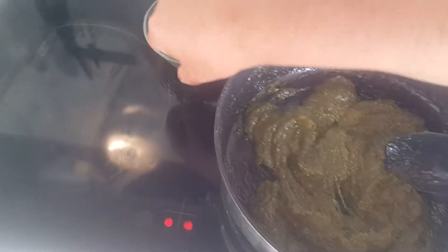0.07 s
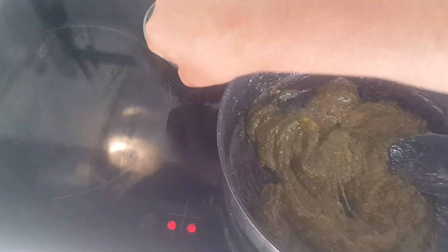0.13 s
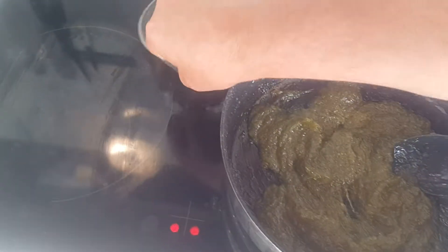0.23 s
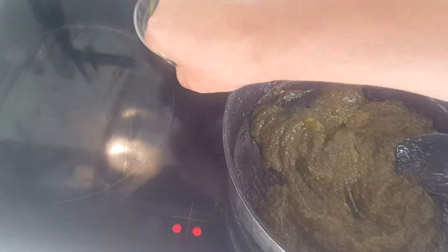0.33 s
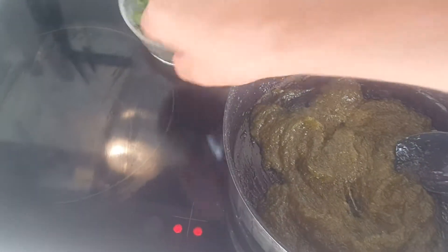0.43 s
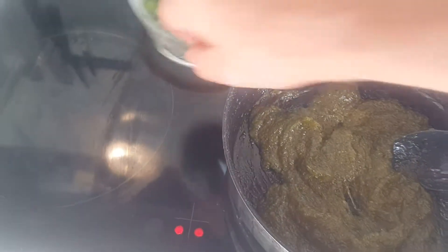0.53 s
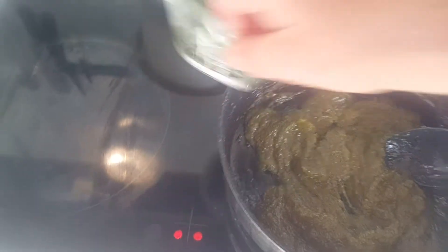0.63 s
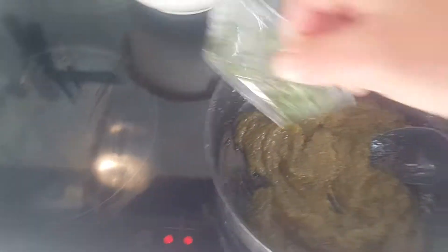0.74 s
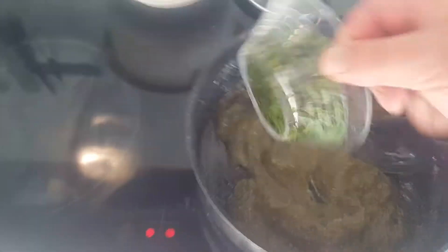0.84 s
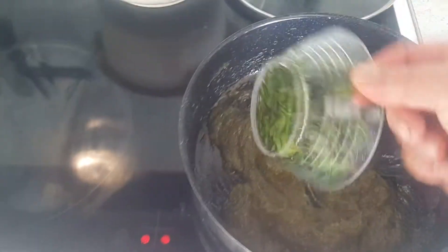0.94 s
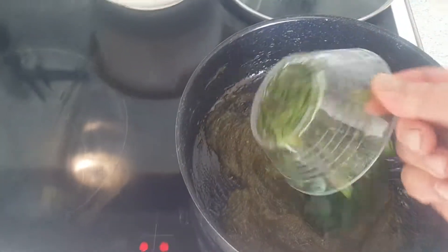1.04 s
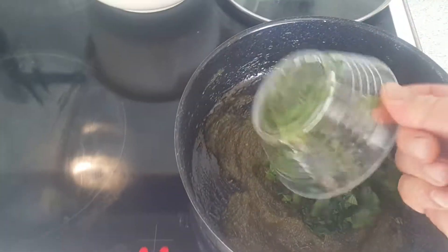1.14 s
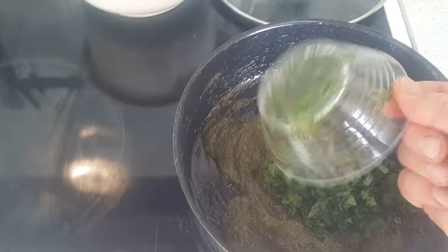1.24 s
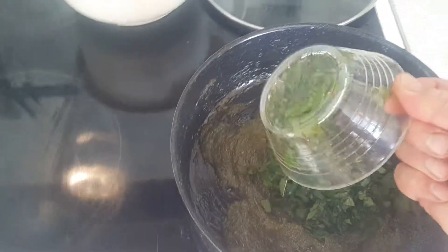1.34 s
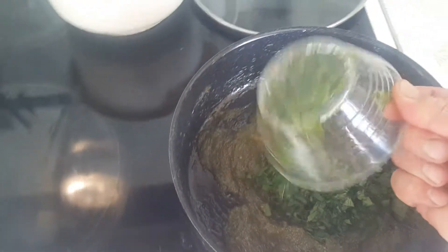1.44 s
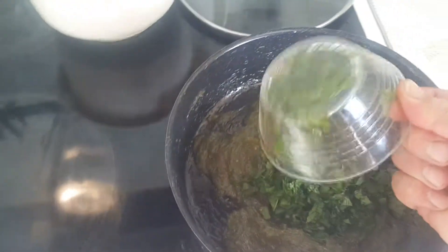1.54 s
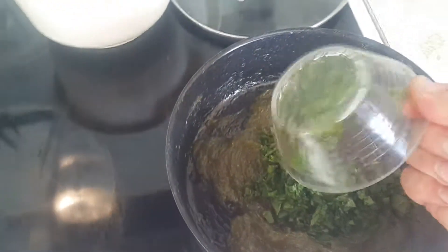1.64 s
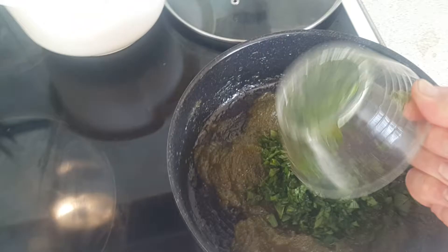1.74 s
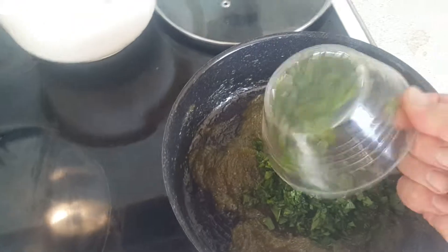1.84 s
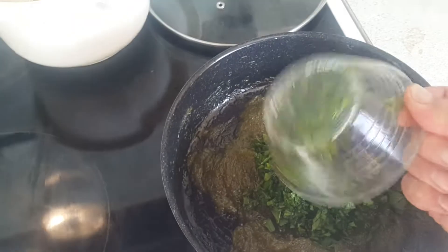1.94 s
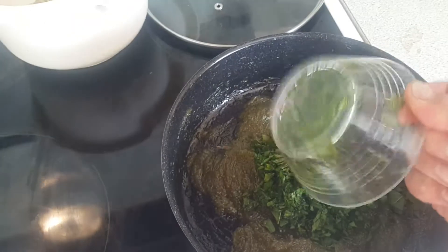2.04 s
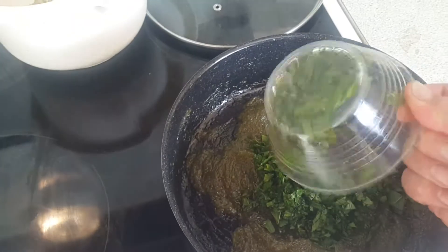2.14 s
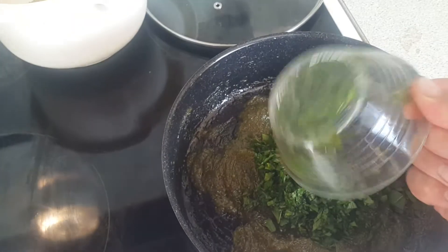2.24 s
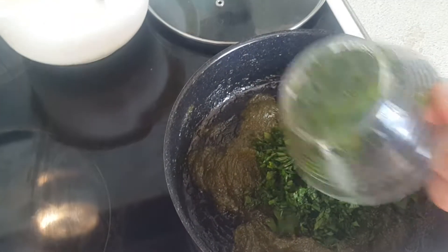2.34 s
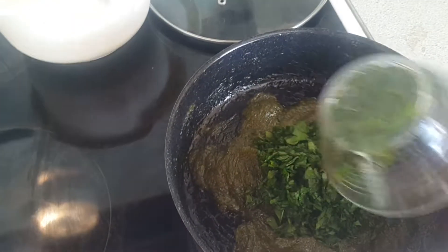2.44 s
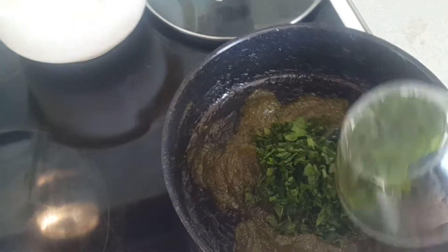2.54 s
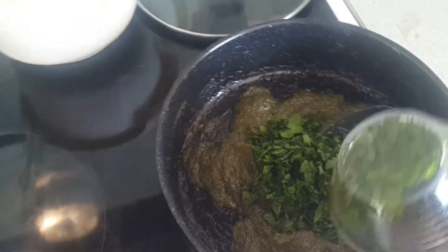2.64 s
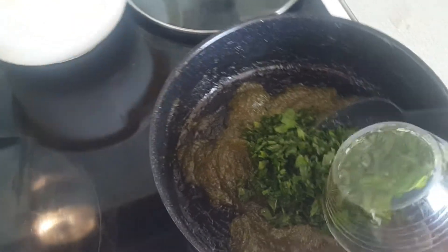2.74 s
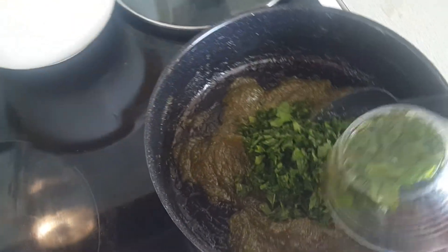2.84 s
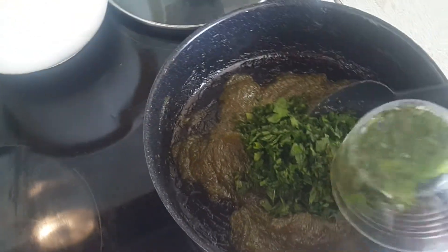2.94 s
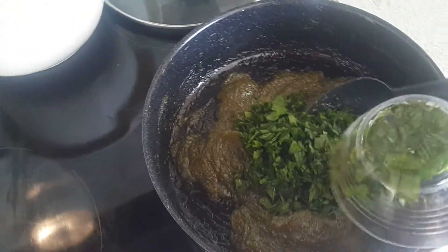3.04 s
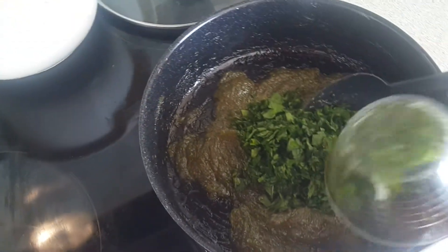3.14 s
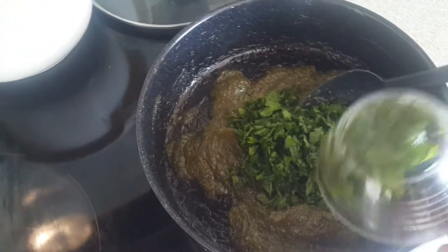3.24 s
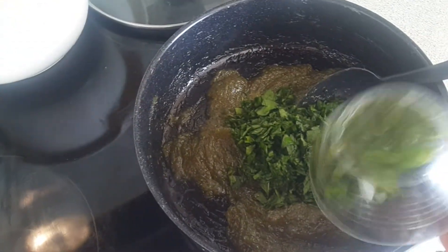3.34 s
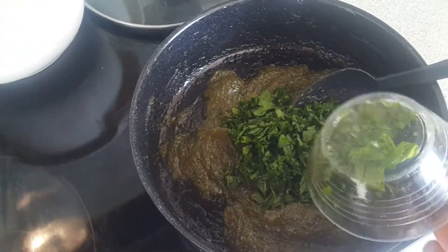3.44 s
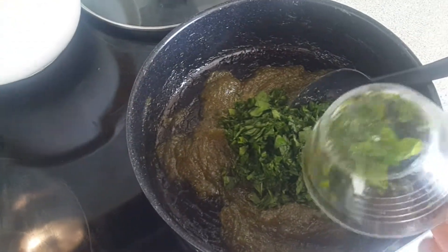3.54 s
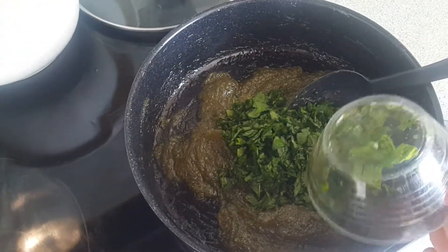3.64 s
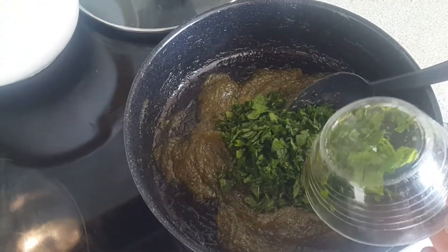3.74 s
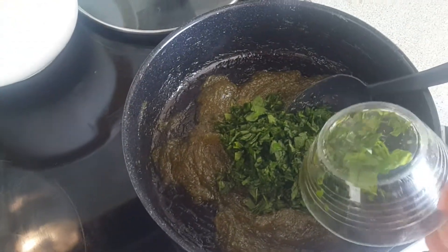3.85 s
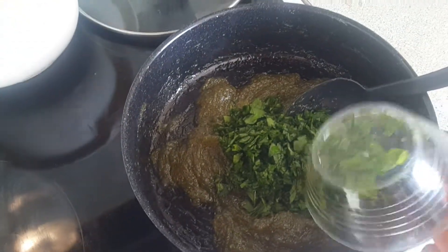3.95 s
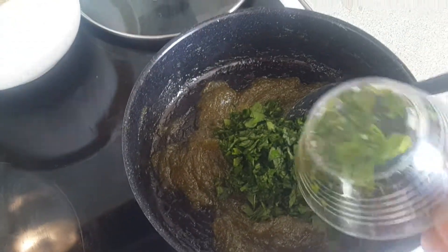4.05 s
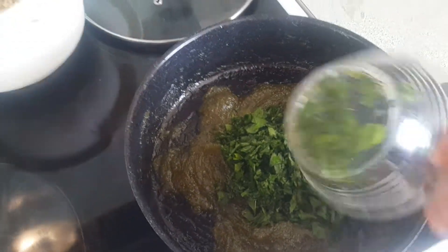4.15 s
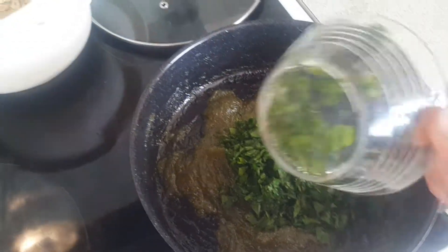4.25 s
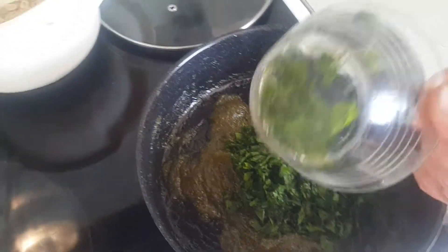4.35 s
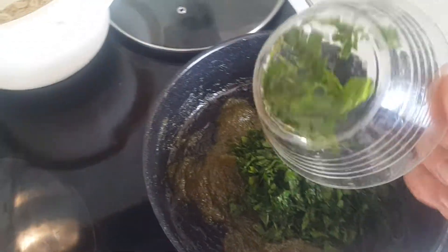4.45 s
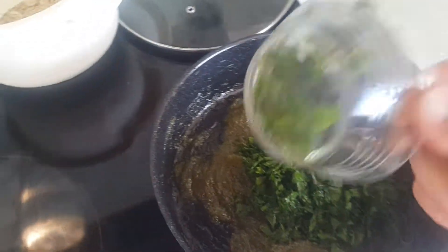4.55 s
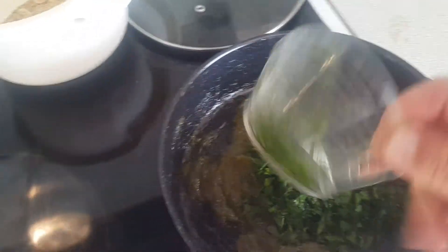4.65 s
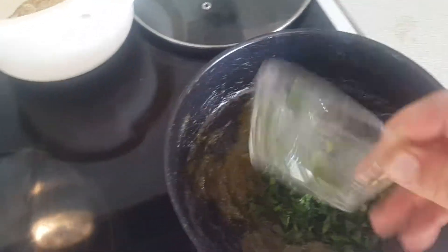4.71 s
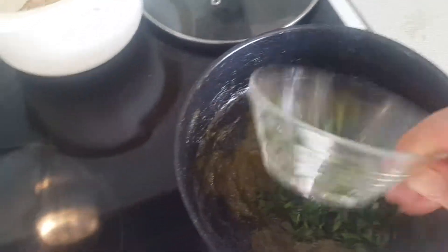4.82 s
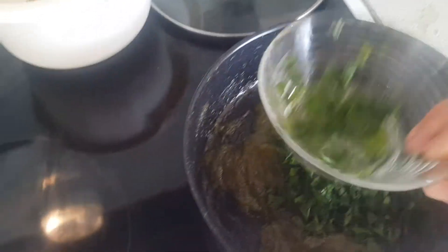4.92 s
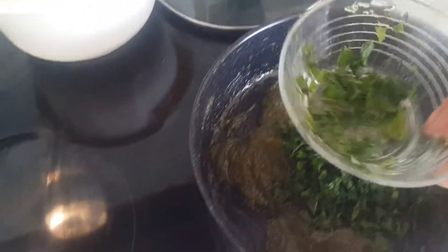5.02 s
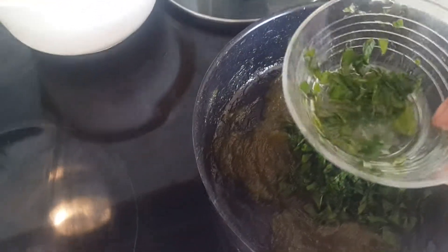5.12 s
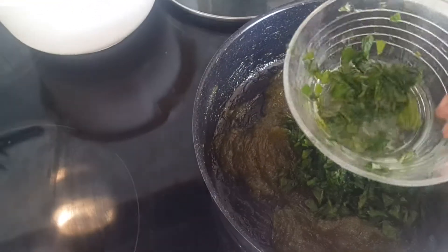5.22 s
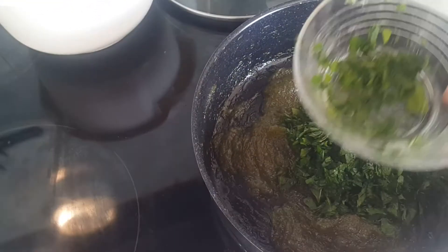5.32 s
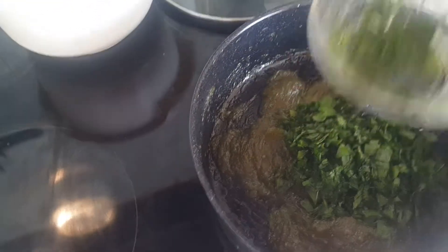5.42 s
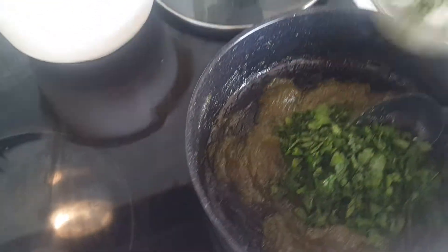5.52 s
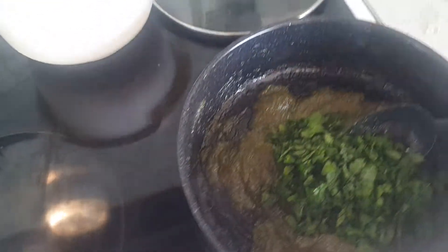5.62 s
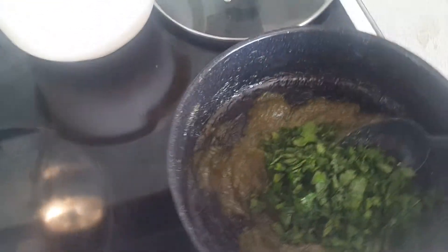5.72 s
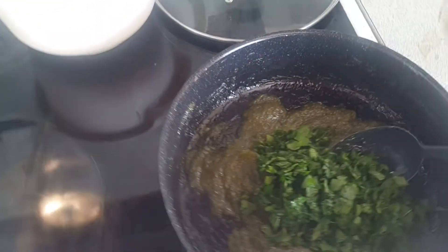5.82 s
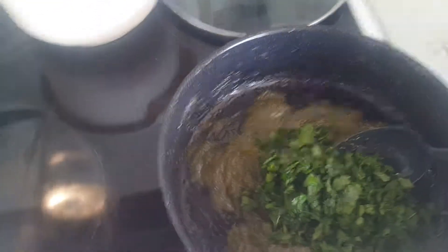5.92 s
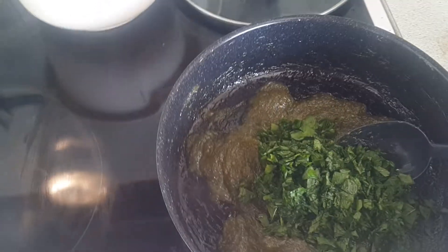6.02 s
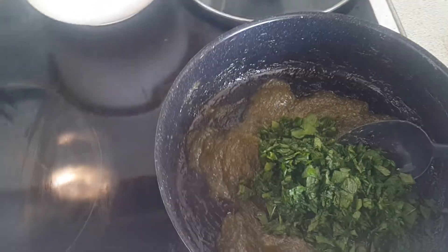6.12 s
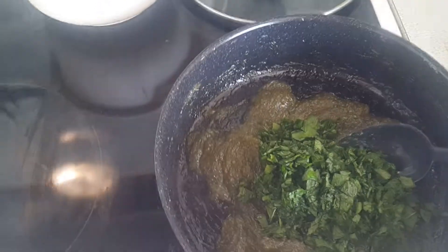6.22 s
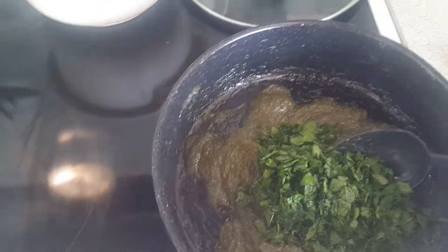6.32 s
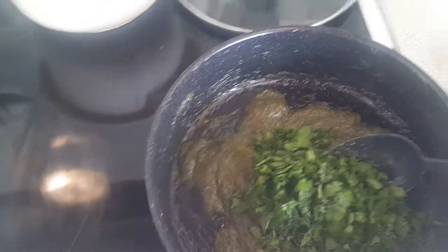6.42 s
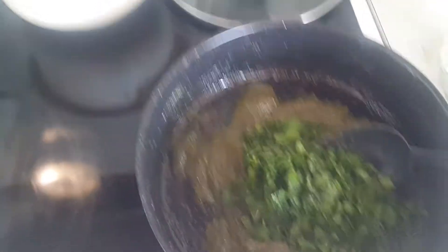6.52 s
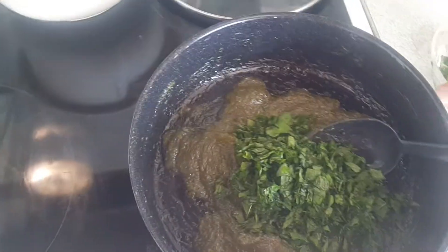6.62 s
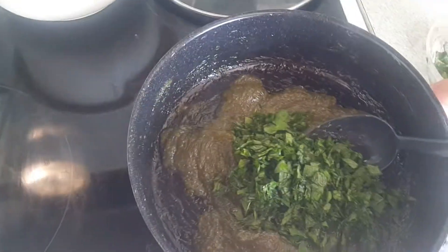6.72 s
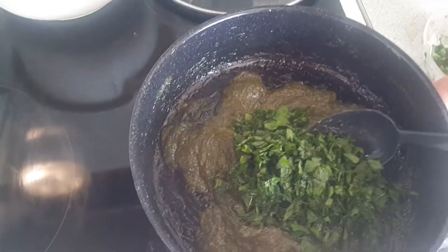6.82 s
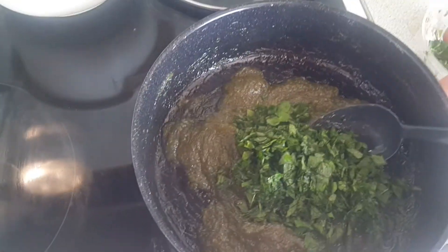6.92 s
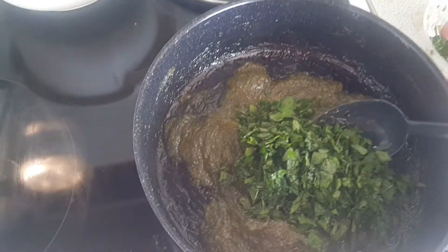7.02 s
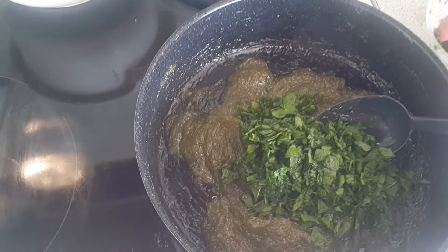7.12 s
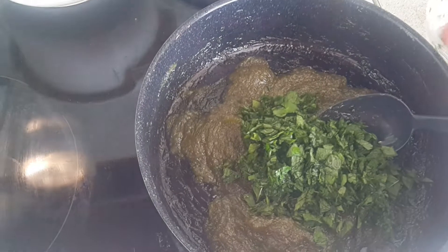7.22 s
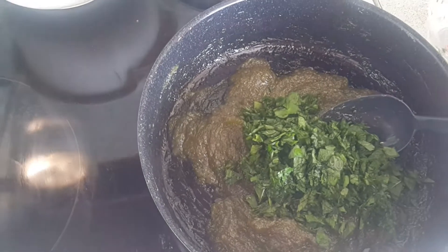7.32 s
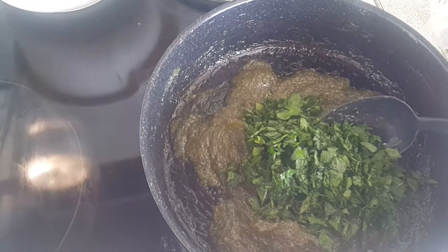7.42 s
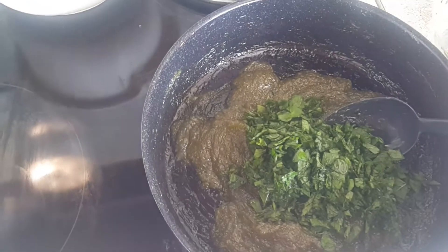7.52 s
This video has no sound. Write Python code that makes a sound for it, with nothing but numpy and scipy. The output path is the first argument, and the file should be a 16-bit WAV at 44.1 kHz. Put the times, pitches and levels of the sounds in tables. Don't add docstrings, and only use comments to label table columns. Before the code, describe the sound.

A plastic bowl raps sharply on a ringing pan in a quiet humming kitchen, then lands on a stone counter and rattles to rest.

```python
import sys
import numpy as np
from scipy import signal
from scipy.fft import rfft, irfft, next_fast_len
from scipy.io import wavfile

SR = 44100
rng = np.random.default_rng(int(sys.argv[2]) if len(sys.argv) > 2 else 0)


def magnitude_from_level(level_db):
    exponent = np.asarray(level_db, float) / 20
    return 10 ** exponent


def unload_wav(signal):
    wavfile.write(
        sys.argv[1],
        SR,
        np.round(np.clip(np.atleast_2d(signal).T, -1, 1) * 32767).astype(np.int16),
    )


N = 333837


def rms_one(x):
    return x / np.sqrt(np.mean(x ** 2) + 1e-20)


def at_hz(points, hz):
    table_hz, value = np.array(points).T
    return np.interp(np.log(hz + 1e-9), np.log(table_hz), value)


def drift(rate, size=N):
    knots = rng.standard_normal(400)
    return np.interp(np.arange(size) * rate / SR, np.arange(len(knots)), knots)


def ring(x, hz, t60):
    r, w = magnitude_from_level(-60 / (t60 * SR)), 2 * np.pi * hz / SR
    return signal.lfilter([0, np.sin(w)], [1, -2 * r * np.cos(w), r * r], x)


def add(out, s, sound):
    i = int(round(s * SR))
    out[:, i:i + sound.shape[-1]] += sound[..., :N - i]


# frequency in Hz, likeness from -1 to 1.
LIKENESS = [(60, 0.66), (180, 0.94), (550, 0.69), (1650, -0.1), (4970, -0.12), (15000, -0.15)]


def bands(spectrum, size):
    hz = np.fft.rfftfreq(size, 1 / SR)
    mid, side = rfft(rng.standard_normal((2, size)))
    alike = np.clip(at_hz(LIKENESS, hz), -1, 1)
    stereo = np.sqrt(1 + alike) * mid + np.sqrt(1 - alike) * side * [[1], [-1]]
    both = magnitude_from_level(at_hz(spectrum, hz)) * stereo
    both = both / np.sqrt(2 * np.mean(np.abs(both) ** 2) / size)
    place = 2 * np.log2(hz / 20 + 1e-9)
    return [(20 * 2 ** (k / 2), irfft(both * np.clip(1 - np.abs(place - k), 0, 1), size))
            for k in range(21)]


def body_rings(modes, t):
    hz, level_db, t60 = np.array(modes).T[:, :, None]
    turn = rng.standard_normal((2, 2, len(modes), 1))
    phase = 2 * np.pi * hz * t + turn[0] * np.minimum((hz / 1100) ** 2, 3)
    twin = 0.46 * np.sin(phase + 2 * np.pi * .006 * hz * t * np.sign(turn[1, :1]) + turn[1])
    rings = magnitude_from_level(level_db - 60 * t / t60) * (np.sin(phase) + twin)
    waver = np.array([[drift(40 + .018 * f, size=2 * len(t)) for f in hz[:, 0]] for side in (0, 1)])
    share = np.clip(0.92 * np.minimum(hz / 3000, 1), 0, 1)
    swing = magnitude_from_level(1.2 * waver * np.minimum(hz / 1500, 1))
    return rings, swing * (1 - share + 1.6 * share * waver[:, ::-1])


# frequency in Hz, t60 in seconds.
KITCHEN = [(100, 0.92), (260, 0.35), (700, 0.41), (1840, 0.39), (4850, 0.42), (12800, 0.25)]


def struck(hits, modes, tail, cycles, swell, modes_db, tail_db, grip, contact_s, crack_t60,
           dry, pan_db, lag_s, size):
    out, t = np.zeros((2, N)), np.arange(size) / SR
    rise = 1 - np.exp(-t / contact_s)
    centre, noise = zip(*bands(tail, 2 * size)[4:])
    centre, noise = np.array(centre)[:, None], np.array(noise)
    dying = magnitude_from_level(-60 * t / (dry * at_hz(KITCHEN, centre))) * (1 - np.exp(-t * centre))
    bright, air = (centre > 2400) & (centre < 6500), centre > 6500
    snap = magnitude_from_level(6.0 - 60 * t / crack_t60) * noise[11:, ::-1, :size].sum(axis=0)
    rings, broken = body_rings(modes, t)
    rattle = magnitude_from_level(2.5 * drift(180, size=2 * size))
    mode_hz = np.array(modes)[:, 0]
    high, low = mode_hz > 2400, mode_hz < 450
    chance = rng.standard_normal((len(hits), 2, len(modes) + len(centre)))
    for (s, thud_db, hz, ring_db, treble_db, crack_db, weight_db), luck in zip(hits, chance):
        z, colour = np.split(luck, [len(modes)], axis=1)
        shape = (t * hz / cycles) ** swell * np.exp(-t * hz / cycles)
        thud = -np.sin(2 * np.pi * hz * t + 2.61) * shape / shape.max()
        late = np.interp(t - lag_s, t, thud, left=0)

        start = int(abs(colour[1, 0]) * SR) % size
        now = slice(start, start + size)
        strengths = magnitude_from_level(modes_db + 1.4 * z[:1] + 1.8 * z + treble_db * high + weight_db * low)
        ringing = np.einsum("cm,cmt,cmt->ct", strengths, rings, broken[..., now])

        sway = magnitude_from_level(2 * np.sin(2 * np.pi * (25 * t + z[0, 0])))
        tint = magnitude_from_level(1.5 * colour[0, :, None] + treble_db * bright + crack_db * air)
        gains = tint * np.where(bright | air, rattle[now], sway)
        wash = np.einsum("bct,bt->ct", noise[..., now], gains * dying)
        wash = wash + magnitude_from_level(crack_db) * np.sign(colour[-1, -1]) * snap
        body = ringing + magnitude_from_level(tail_db) * wash

        held_db = grip * np.clip(-ring_db, 0, 12) * np.exp(-t / 0.025)
        add(out, s, magnitude_from_level(thud_db) * magnitude_from_level([[pan_db], [-pan_db]]) * [thud, late])
        add(out, s, magnitude_from_level(ring_db + held_db) * rise * body)
    no_bass = signal.butter(3, 120, "high", fs=SR, output="sos")
    return signal.sosfilt(no_bass, out)


def blows(rows, hz, treble_db, crack_db):
    return [(s, thud_db, hz * 2 ** (.005 * hard), ring_db, treble_db + 0.62 * hard,
             crack_db + 0.71 * hard, weight_db)
            for s, thud_db, ring_db, hard, weight_db in rows]


# start in seconds, thud in dB, ring in dB, hardness in dB, weight on the low modes in dB.
KNOCKS = [(2.8175, -10, -9.5, -9, 3), (3.011, -14.5, -14, -3, 2), (3.1175, -2.5, -12.5, 1.8, -1),
          (3.1458, -2, 3.5, 2, -1.5), (3.172, -21, -11.5, -1.5, -4.5), (3.418, -1.5, -3, 3.5, -6),
          (3.431, -3, -3, 6.5, -6.5), (3.4335, -6.5, -26.5, -2, 0), (3.449, -14.5, -6.5, 2, -5.5),
          (3.684, -8, -15, 1, 3.5), (3.6893, -1, 0.5, 6, -6), (3.876, -13.5, -13.5, 0.5, -0.5),
          (3.8945, -2, -7.5, 4, -3), (3.9015, -6, -27.5, 2, 0), (3.9155, -12.5, -19.5, -4.5, 1.5)]
# frequency in Hz, level in dB, t60 in seconds.
PAN = [(160, -10.5, 0.13), (290.3, -7.5, 0.18), (325, -4, 0.31), (400, -18, 0.15), (515.4, -10.5, 0.17),
       (632, -6, 0.42), (717, -10.5, 0.37), (923, 3, 0.05), (928, -1.5, 0.31), (1003, -7, 0.26),
       (946, -6.5, 0.5), (1033, -11, 0.089), (1202, -4, 0.35), (1350, -9.5, 0.25), (1510, -1.5, 0.046),
       (1700, -8, 0.34), (1600, -15, 0.25), (1880, -12.5, 0.26), (2113, -9, 0.32), (2330, -15, 0.098),
       (2643, -11.5, 0.42), (2820, -18, 0.25), (3100, -11, 0.18), (4700, -23.5, .25), (4470, -20.5, 0.25),
       (4820, -26.5, 0.47), (5500, -22.5, 0.2), (4940, -27, 0.33), (4860, -23, .25), (5206, -26, 0.29),
       (5740, -27, .23), (3316, -19.5, 0.22), (1760, -10.5, .28)]
# frequency in Hz, level in dB per Hz.
KNOCK_TAIL = [(60, -30), (240, -11), (320, -1.5), (640, -2), (920, -1.5), (1150, -9.5), (1700, 2),
              (2150, -11.5), (2900, -10.5), (3900, -20), (4900, -16), (5700, -19), (7200, -29),
              (14800, -25)]


def knocks():
    on_spoon = blows(KNOCKS[:2], 920, treble_db=-0.5, crack_db=-3)
    on_rim = blows(KNOCKS[2:], 920, treble_db=-1.22, crack_db=-1.45)
    return struck(on_spoon + on_rim, PAN, KNOCK_TAIL, cycles=0.26, swell=2.8, modes_db=-23.0,
                  tail_db=-15.5, grip=0.92, contact_s=0.0012, crack_t60=0.033, dry=0.93,
                  pan_db=-0.8, lag_s=-0.00021, size=24000)


def settling():
    gaps_s = 0.023 * 0.81 ** np.arange(3)
    starts = 6.263 + np.cumsum(np.r_[0, gaps_s])
    return [(s, -28 - 7 * k, -9 - 20.5 * k, 5, 0) for k, s in enumerate(starts)]


# start in seconds, thud in dB, ring in dB, hardness in dB, weight on the low modes in dB.
ROCKING = [(6.0595, -5.5, -5.5, 6.5, -4.5), (6.0715, -12, -27, -12, 1), (6.0795, -18, -24, -13, -7),
           (6.0845, -19.5, -25, -9, -4), (6.0945, -22, -29, -4, -4), (6.1145, -21, -23, -7, -5),
           (6.1195, -22, -23, -2, -5), (6.131, -17.5, -22, -2, -5), (6.172, -18, -24, -5, -4),
           (6.2405, -15, -17.5, -6, 0), (6.245, -18, -20, -3, -1), (6.277, -23, -16.5, -2, 0),
           (6.1072, -7.5, -5, 4.5, -3.5), (6.1255, -9.5, -11.5, -4, 4.5), (6.141, -11, -9, 5.5, -11),
           (6.153, -13.5, -15, -8, -1), (6.165, -13.5, -14.5, -2.5, -5), (6.2325, -10.5, 1.5, -0.5, -10.5),
           (6.2365, -18, -10, -2, 4.5), (6.2045, -26, -34, -5.5, -2)]
# frequency in Hz, level in dB, t60 in seconds.
COUNTER = [(152.5, -11, 0.31), (318, -7.5, 0.4), (486.7, -8.5, 0.42), (533, -21.5, 0.45), (738, -1, 0.1),
           (797, -5, 0.33), (862, -3, 0.27), (1230, -5, 0.35), (1096, -10, 0.25), (1247, -1.5, 0.12),
           (1490, -2, 0.094), (1540, -13, 0.11), (1590, 1.5, 0.2), (1630, -5, .2), (1650, -17, 0.57),
           (1855, -26.5, 0.24), (2040, -15, 0.37), (2460, -23, 0.17), (2370, -35, 0.22),
           (2790, -13.5, 0.14), (3130, -15, 0.17), (3360, -38, .25)]
# frequency in Hz, level in dB per Hz.
ROCK_TAIL = [(35, -73.5), (60, -43), (146, -11), (315, -14.5), (389, -11), (469, -5.5), (924, -1.5),
             (1620, 2), (1950, -5), (3190, -26), (6740, -47), (13600, -43.5), (16000, -66)]


def rocking():
    hits = blows([*ROCKING, *settling()], 1403, treble_db=2, crack_db=-7)
    return struck(hits, COUNTER, ROCK_TAIL, cycles=0.31, swell=12.8, modes_db=-24.0,
                  tail_db=-15.0, grip=.4, contact_s=0.00092, crack_t60=0.022, dry=0.98,
                  pan_db=2.5, lag_s=0.00082, size=22000)


# start in seconds, frequency in Hz, level in dB, t60 in seconds.
GLASS = [(6.234, 1650, -17, .14), (6.236, 1648, -21, .45), (6.235, 1672, -28, .45), (6.235, 3170, -43, .47),
         (6.109, 3200, -46, .1), (6.143, 3200, -46, .08), (6.061, 13300, -52, .04),
         (6.108, 13300, -52, .05), (6.127, 13250, -55, .03), (6.126, 14200, -55, .03),
         (6.142, 13300, -54, .07), (6.16, 13350, -57, .05), (6.234, 13350, -51, .05),
         (6.255, 13300, -57, .04), (6.235, 10200, -58, .03), (6.287, 9500, -56, .09),
         (6.29, 12300, -58, .04), (6.31, 15600, -63, .2), (6.283, 14350, -61, .12),
         (6.288, 14050, -62, .14), (6.28, 13300, -64, .2), (6.289, 4950, -61, .3), (6.35, 4930, -66, .3),
         (6.323, 7020, -56, .15)]
# start in seconds, frequency in Hz, level in dB, t60 in seconds.
CHIMES = [(2.818, 2080, -36, .18), (2.818, 2147, -36, .25), (2.819, 2330, -40.5, .18),
          (3.012, 2110, -39.5, .14), (3.146, 1042, -28.5, .5), (3.147, 643, -28, .49),
          (3.432, 971, -28, .38), (3.895, 1760, -32, .33), (3.2, 150, -40, .9), (6.06, 1166, -22.5, .14),
          (2.818, 700, -30, .15), (3.012, 690, -33, .18), (3.147, 4800, -39, .25), (3.147, 3150, -37, .25),
          (3.432, 2643, -35, .3), (3.432, 4760, -42, .36), (3.69, 3170, -38, .36), (3.69, 2640, -38, .36),
          (3.69, 4700, -40, .33), (3.895, 2643, -38, .28), (3.895, 1010, -33, .45), (3.895, 4790, -48, .34),
          (3.69, 326, -26, .3)]


def chimes():
    out, t = np.zeros((2, N)), np.arange(SR // 2) / SR
    for s, hz, level_db, t60 in [*GLASS, *CHIMES]:
        flutter = magnitude_from_level(3.5 * (hz > 8000) * drift(300.0, size=len(t)))
        tone = ring((t == 0) + 1e-18, hz, t60) * (1 - np.exp(-t / 0.0009))
        add(out, s, magnitude_from_level(level_db - 2.6 * (hz > 6000)) * flutter * tone * magnitude_from_level([[3], [-3]]))
    return out


# start in seconds, peak in dB, frequency in Hz.
BUMPS = [(0.774, -32, 109), (1.185, -40, 68), (2.122, -54, 137), (2.425, -37, 142), (6.746, -37, 162),
         (2.829, -22, 152.4), (3.022, -26, 152), (3.434, -21, 151), (3.70, -26.5, 139), (3.9, -28, 151.3),
         (6.066, -28, 151), (6.242, -20.5, 151)]


def bumps():
    out, t = np.zeros((2, N)), np.arange(4000) / SR
    for s, peak_db, hz in BUMPS:
        push = np.sin(2 * np.pi * hz * t) * t * hz * np.exp(-1.1 * t * hz)
        no_rumble = signal.butter(3, 0.85 * hz, "high", fs=SR, output="sos")
        add(out, s, magnitude_from_level(peak_db - 2.0) * signal.sosfilt(no_rumble, push))
    return out


# start in seconds, thud in dB, thud pitch in Hz.
TOUCHES = [(0.075, -37, 670), (0.098, -41, 650), (0.177, -39, 494), (0.182, -31.5, 526), (0.214, -41, 560),
           (0.25, -37, 724), (0.299, -49, 880), (0.883, -44, 1190), (0.914, -44, 900), (1.305, -44.5, 940),
           (1.566, -41, 1090), (1.875, -41.5, 820), (2.209, -46, 860), (2.699, -43, 770), (4.62, -52, 990),
           (5.039, -45.5, 811), (5.214, -47, 900), (5.482, -42, 526), (5.539, -47.5, 730),
           (5.615, -45, 1300), (5.751, -49.5, 1290), (5.824, -41, 1300), (5.945, -41, 596),
           (5.995, -41, 990), (6.997, -40, 750), (7.074, -38.5, 770), (7.132, -41, 1300), (6.909, -44, 800),
           (6.92, -45, 1400), (7.242, -34, 1350), (7.379, -40.5, 840), (7.491, -39, 860), (0.256, -39, 770),
           (0.271, -50, 704), (0.016, -53, 1210)]


def touches():
    soft = [(s, db, hz, db - 7, -3.5, -25, 1.1) for s, db, hz in TOUCHES]
    modes = [*PAN[2:7], *PAN[9:15], *PAN[16:17]]
    return struck(soft, modes, KNOCK_TAIL, cycles=0.75, swell=0.73, modes_db=-15.0,
                  tail_db=-10.5, grip=0.37, contact_s=0.0005, crack_t60=0.06, dry=0.88,
                  pan_db=-1.0, lag_s=.0001, size=9000)


# start in seconds, length in seconds, frequency in Hz, width in Hz, level in dB.
SLIDES = [(0.0, .035, 900, 1200, -56), (0.175, .05, 570, 200, -47), (0.24, 0.06, 750, 380, -46.5),
          (1.115, 0.05, 3200, 3000, -62), (4.565, 0.13, 1030, 44, -67), (5.045, .03, 1000, 600, -58),
          (5.47, 0.08, 890, 550, -54), (5.475, .08, 3500, 4000, -62), (6.86, 0.29, 745, 24, -57),
          (6.84, 0.44, 1250, 220, -59.5), (6.986, .026, 760, 44, -46.5), (7.03, 0.07, 765, 28, -53),
          (7.236, 0.034, 520, 46, -48), (7.236, 0.037, 1270, 150, -52), (7.45, 0.096, 1500, 2200, -60)]


def slides():
    out = np.zeros((2, N))
    for s, length, hz, width, level_db in SLIDES:
        grip = magnitude_from_level(7.0 * (width > 45) * drift(77.5, size=20000))
        rub = grip * rng.standard_normal((2, 20000))
        rub = rub[:, :int(length * SR)] * [[1], [.4]]
        hum = rms_one(ring(rub + rub[::-1], hz, 2.2 / width))
        add(out, s, magnitude_from_level(level_db) * hum * np.hanning(hum.shape[1]) ** 0.25)
    return out


# start in seconds, peak in dB, frequency in Hz.
TICKS = [(0.145, -48, 3100), (0.32, -51, 4300), (0.4916, -52, 3630), (0.8093, -49.5, 3680),
         (0.9437, -56, 3920), (1.1213, -43.5, 3450), (1.14, -48, 3040), (1.949, -63, 4430),
         (1.984, -49, 3500), (2.461, -59, 5720), (2.4874, -68, 3670), (2.7047, -43, 2560),
         (4.1971, -68, 14470), (4.437, -58.5, 4020), (4.696, -56.5, 4200), (4.483, -60.5, 1900),
         (6.966, -53.5, 3600), (7.216, -60, 3700), (5.058, -54, 3200), (5.4936, -50, 3450),
         (5.902, -47, 3600), (6.9441, -54.5, 3600), (7.472, -45, 3930), (0.008, -50, 4860),
         (0.097, -60, 3600), (0.177, -50, 2800), (0.219, -47, 3000), (0.354, -57, 5760), (0.515, -64, 5960),
         (0.6125, -55, 4030), (0.68, -60, 5000), (0.72, -65, 6500), (1.025, -52, 3640), (1.3054, -49, 2680),
         (1.4975, -58, 2960), (1.878, -56, 3300), (2.1066, -54, 3270), (2.717, -56.5, 5500),
         (4.6705, -60, 3550), (4.837, -67, 3500), (4.89, -67.5, 3540), (5.041, -59.5, 3100),
         (5.1724, -55, 2920), (5.425, -58, 2670), (5.4757, -56, 2690), (5.611, -53, 2890),
         (5.9307, -54, 2700), (5.956, -49, 3200), (6.551, -50, 3560), (6.614, -49, 3190),
         (6.9633, -55, 3180), (7.036, -52, 3670), (7.1758, -58, 3000), (7.513, -52, 2650)]


def ticks():
    out, t = np.zeros((2, N)), np.arange(3000) / SR
    for s, peak_db, hz in TICKS:
        decay = np.exp(-t / 0.0011) + 0.13 * np.exp(-t / 0.039)
        puff = rng.standard_normal((2, len(t))) * decay
        wide = signal.butter(4, [hz / 1.3, min(hz * 1.25, 19000)], "band", fs=SR, output="sos")
        add(out, s, magnitude_from_level(peak_db + 7.5) * signal.sosfilt(wide, puff))
    return out


# start of sinking in seconds, depth in dB, sinking time in seconds, hold in seconds.
DUCKS = [
    (3.701, 11.5, 0.62, 0.63),
    (6.523, 2, 0.22, 0.11),
]


def tone_db():
    t = np.arange(N) / SR
    easing = -50.5 - 0.45 * t.clip(0, 2.5)
    level = np.where(t < DUCKS[0][0], easing, -51.5)
    for s, depth_db, sink, hold in DUCKS:
        left_db = depth_db * (1 - 0.25)
        leap_s, recover_s = 0.047, left_db / 17
        corners = np.cumsum([s, sink, hold, leap_s, recover_s])
        level = level - np.interp(t, corners, [0, depth_db, depth_db, left_db, 0])
    return level


def simmer():
    pops_per_s, wash_s = 22.0, 0.0025
    born = (rng.random(N) < pops_per_s / SR) * magnitude_from_level(5.0 * np.minimum(rng.exponential(1, N), 3))
    wash = signal.lfilter([1], [1, -np.exp(-1 / (wash_s * SR))], born)
    band = signal.butter(3, [500, 3000], "band", fs=SR, output="sos")
    hiss = signal.sosfilt(band, rng.standard_normal((2, N)))
    return wash * hiss * magnitude_from_level(tone_db() - 4.5)


# frequency in Hz, level in dB per Hz.
ROOM_TONE = [(13, -46), (22, -22), (36, -10), (136, -2), (242, -6), (302, -9), (510, -1), (602, -9),
             (690, -5.5), (771, -8.5), (1450, -12), (1760, -14.5), (5170, -26), (7000, -38.5),
             (16000, -29.5)]
# frequency in Hz, level in dB rms.
HUM = [(134.6, -65.5), (312.2, -69), (409.1, -83.5), (522.2, -70), (678.3, -69), (936.7, -74), (1297, -83),
       (1453, -72.5), (2702, -80.5), (15369, -98.5)]


def room_tone():
    together = drift(7.5)
    air = np.zeros((2, N))
    for hz, band in bands(ROOM_TONE, next_fast_len(N)):
        flicker_db = (together * (hz > 250) + 1.4 * drift(8.2)) * 0.95 * min(1, 1500 / hz) ** .4
        air = air + band[:, :N] * magnitude_from_level(flicker_db)
    t = np.arange(N) / SR
    for hz, level_db in HUM:
        phase = 2 * np.pi * (hz * t + .4 * drift(5.0))
        strength = magnitude_from_level(level_db + 55.0 + 0.78 * drift(2.7))
        air = air + strength * np.sin(phase + [[0], [hz / 600]])
    return air * magnitude_from_level(tone_db())


def scene():
    contacts = knocks() + rocking() + touches() + bumps()
    return contacts + slides() + ticks() + chimes() + simmer() + room_tone()


def low_pass(x):
    return signal.sosfilt(signal.butter(12, 17000, fs=SR, output="sos"), x)


# frequency in Hz, left minus right in dB.
PORTS = [(60, -3), (110, 2.5), (200, 3.5), (380, -1.5), (700, 1), (1290, 3), (2380, -1.5), (4400, 6.5),
         (8120, 13.5), (15000, -5.5)]


def record(dry):
    size = next_fast_len(N)
    hz = np.fft.rfftfreq(size, 1 / SR)
    top_db = 55 * np.clip((hz - 15850) / 150, 0, 1)
    tilt = magnitude_from_level(at_hz(PORTS, hz) / 2 * np.array([[1], [-1]]) - top_db)
    ported = irfft(rfft(dry, size) * tilt, size)[:, :N]
    rounded = 1.334 * np.tanh(ported / 1.286)
    return low_pass(rounded)


dry = scene()
out = record(dry)
unload_wav(out)
```